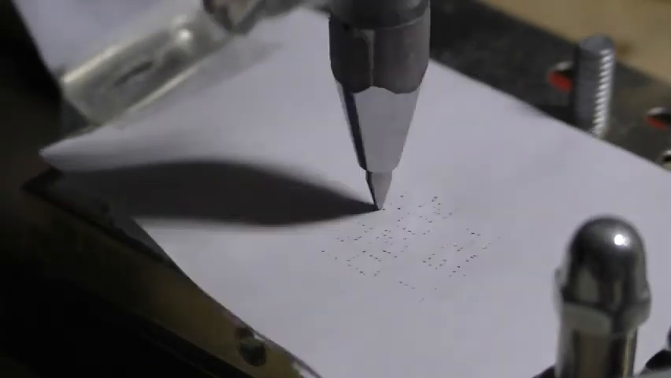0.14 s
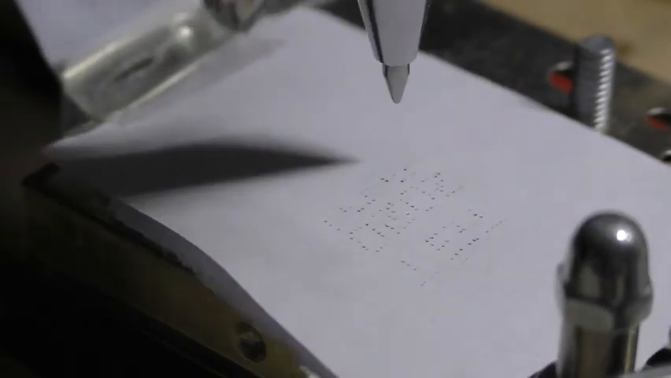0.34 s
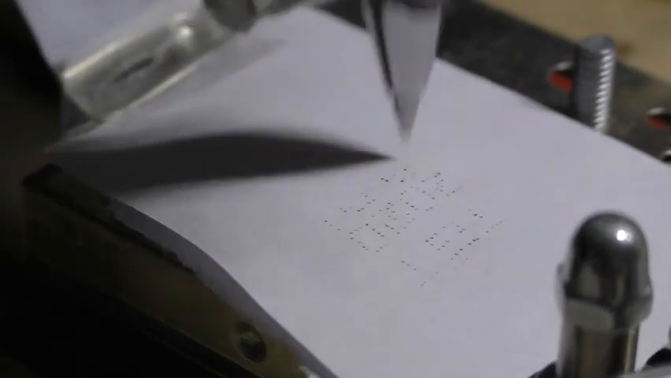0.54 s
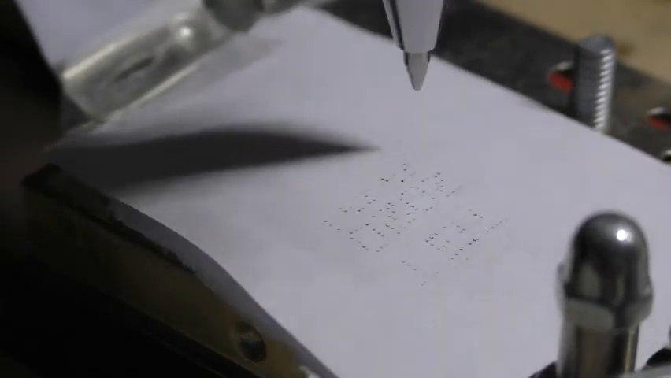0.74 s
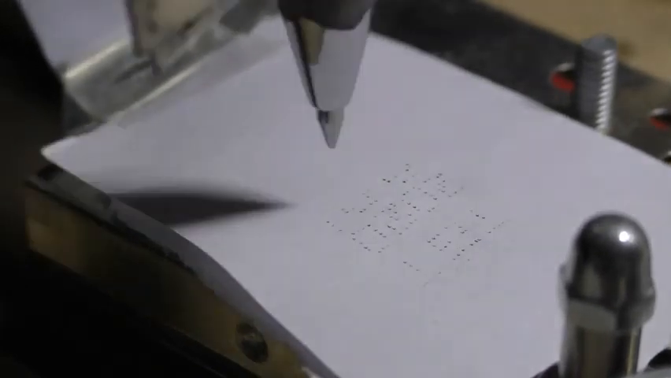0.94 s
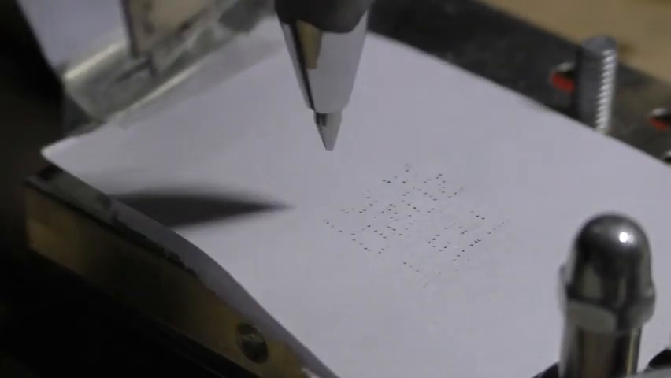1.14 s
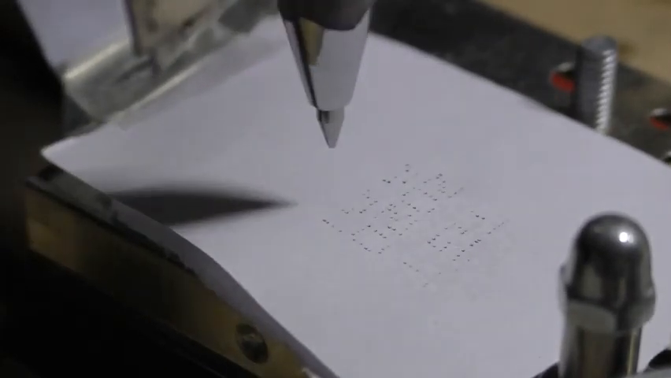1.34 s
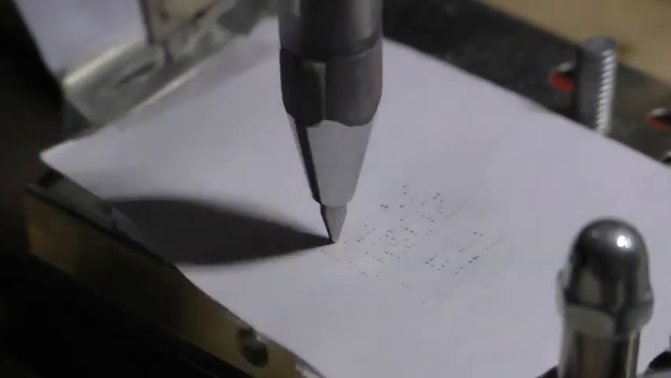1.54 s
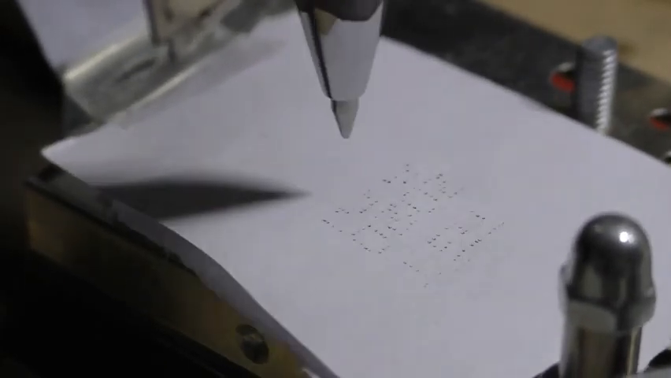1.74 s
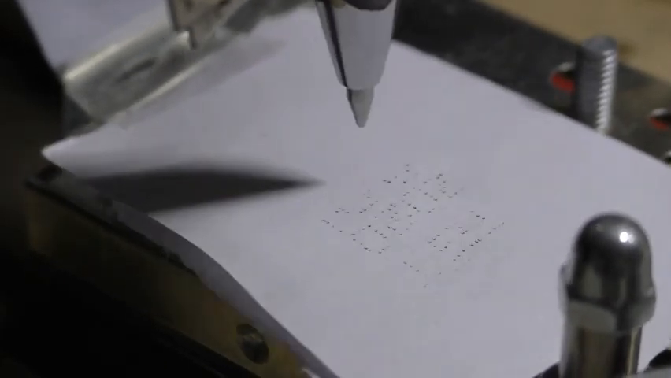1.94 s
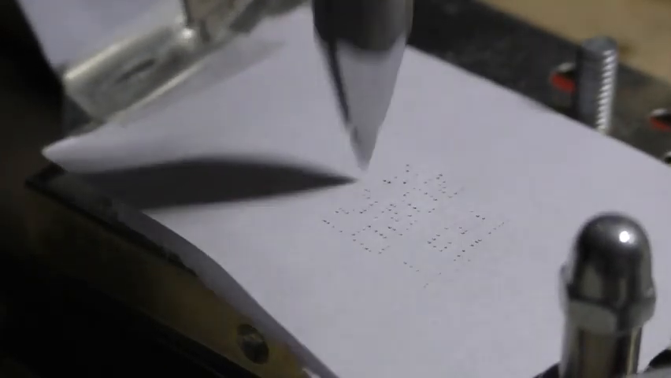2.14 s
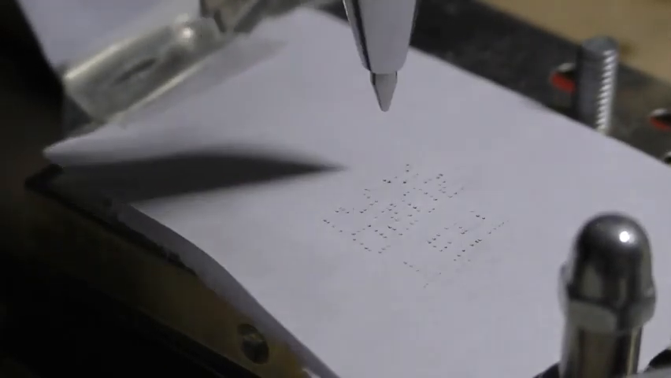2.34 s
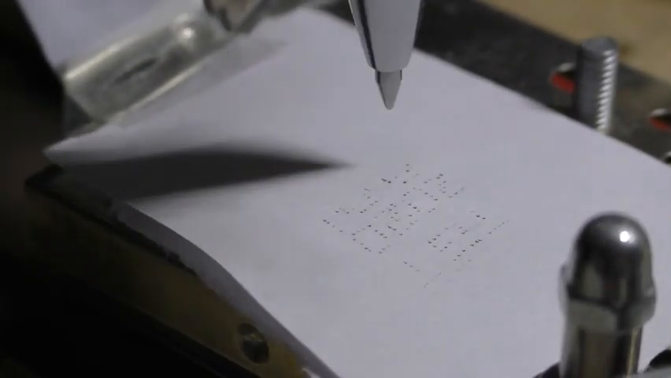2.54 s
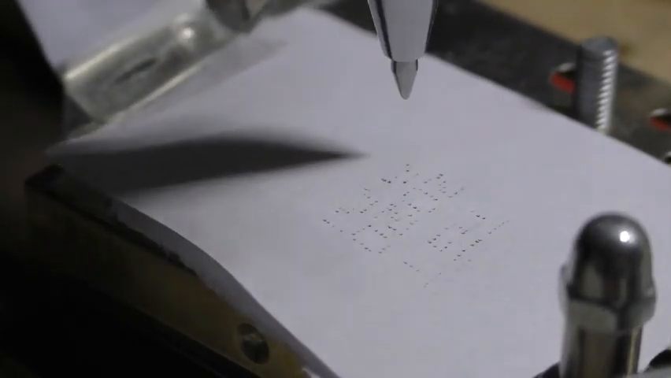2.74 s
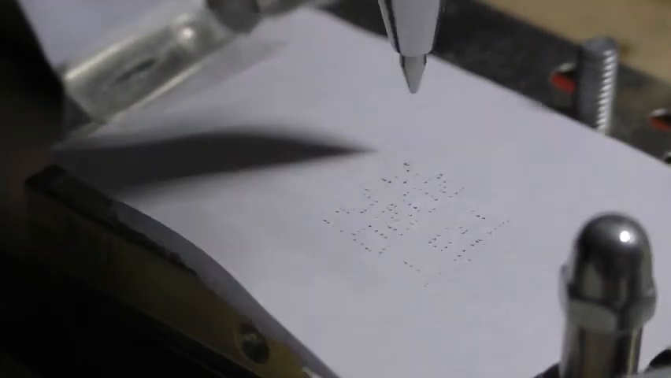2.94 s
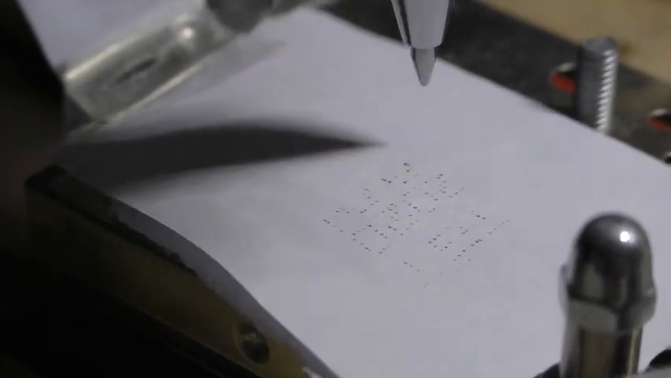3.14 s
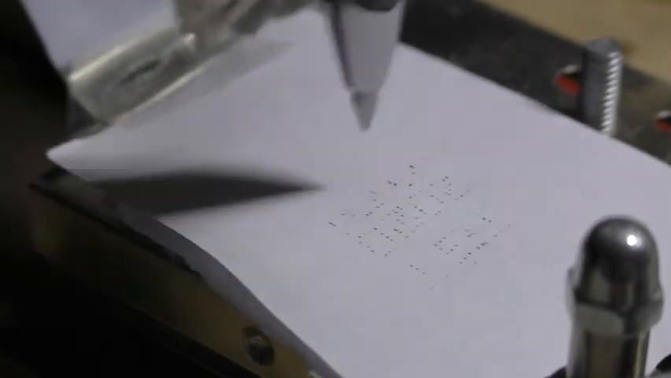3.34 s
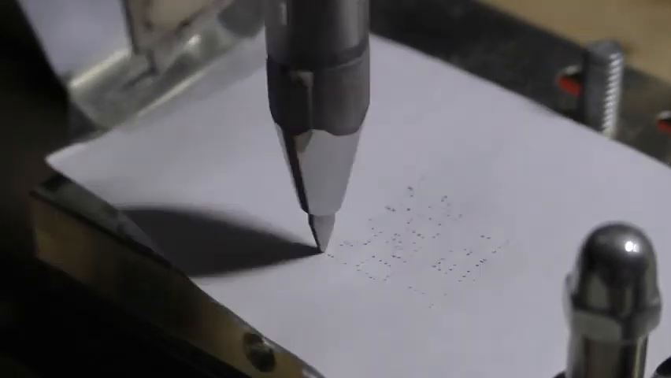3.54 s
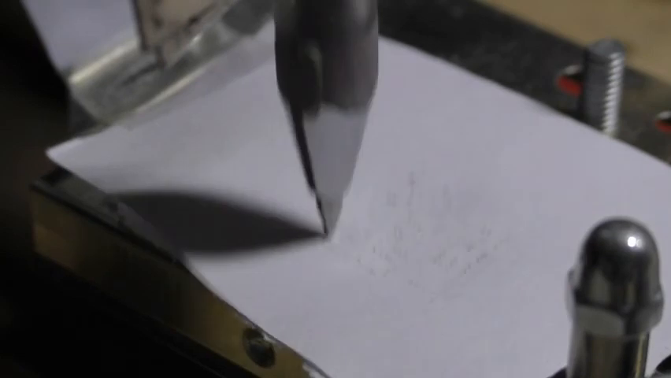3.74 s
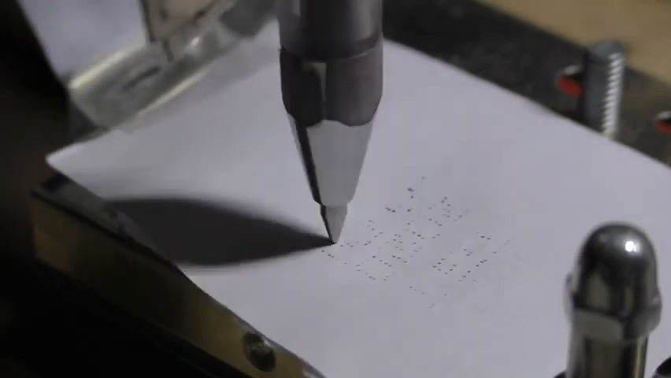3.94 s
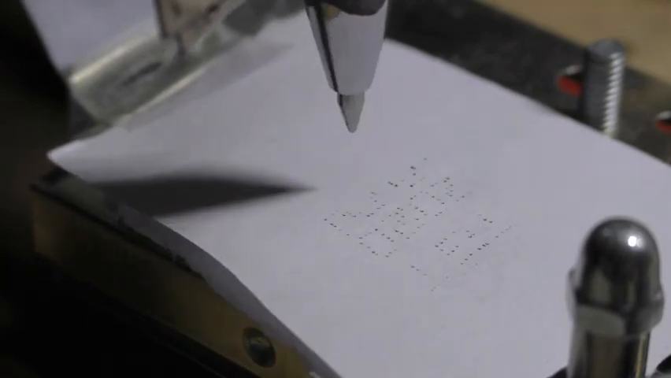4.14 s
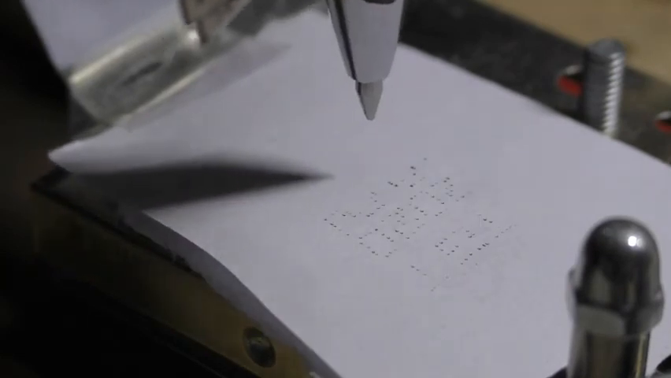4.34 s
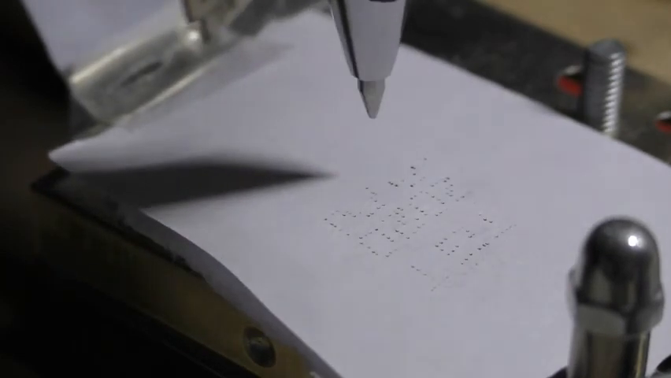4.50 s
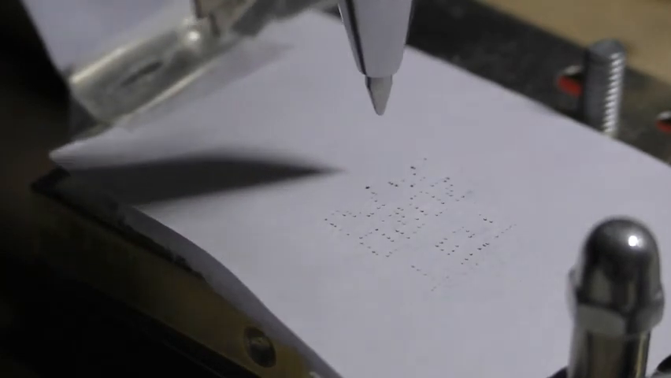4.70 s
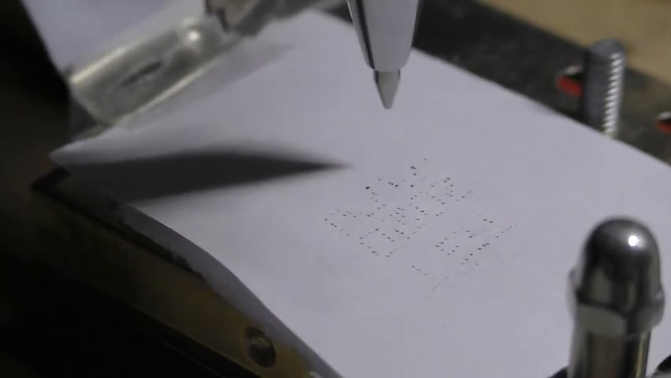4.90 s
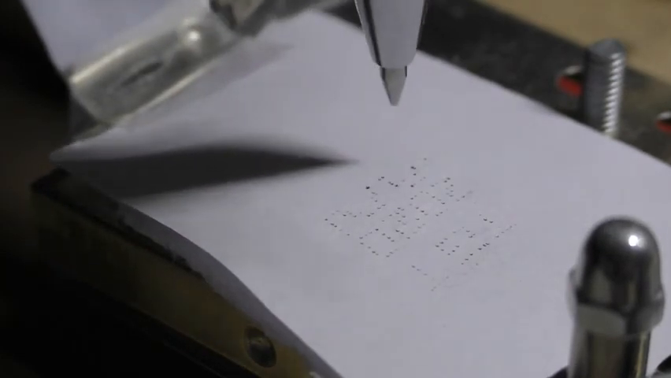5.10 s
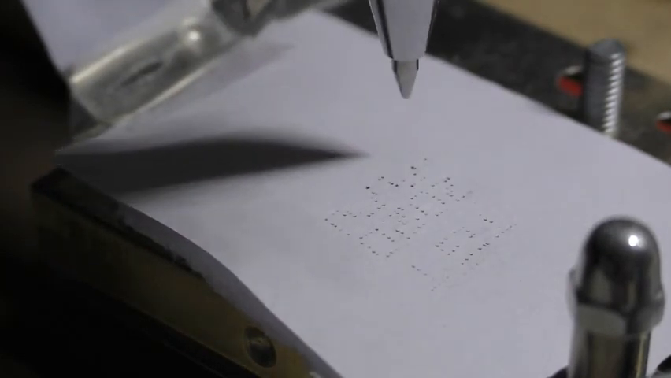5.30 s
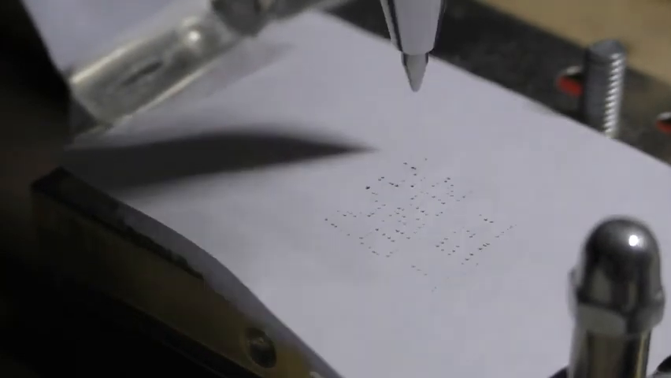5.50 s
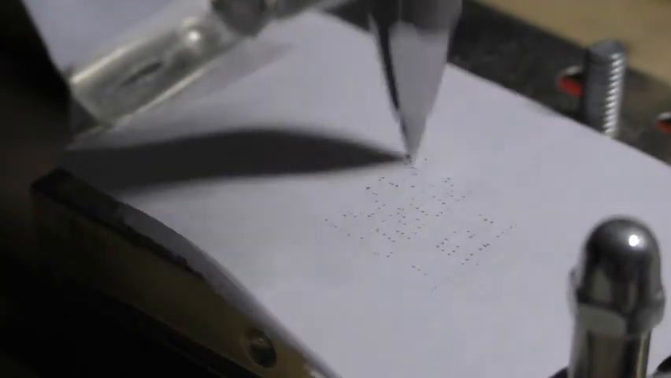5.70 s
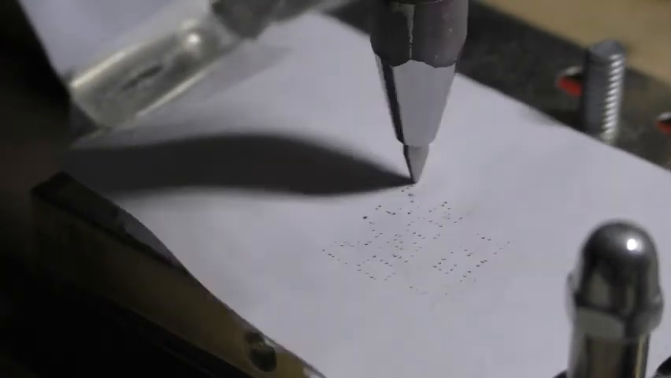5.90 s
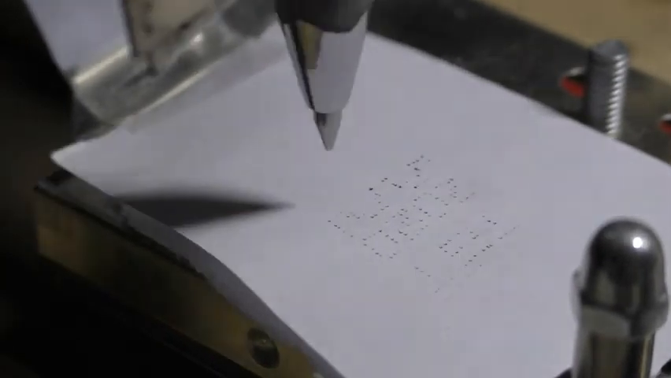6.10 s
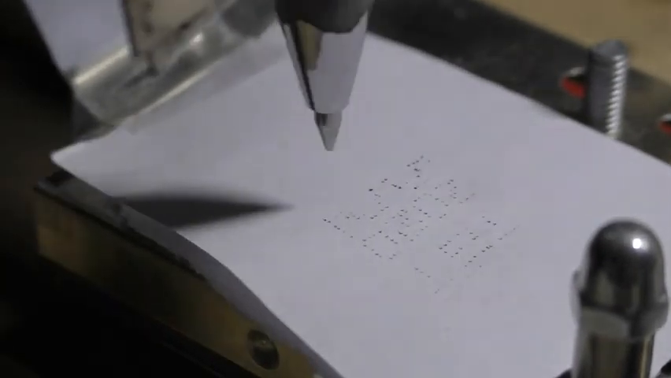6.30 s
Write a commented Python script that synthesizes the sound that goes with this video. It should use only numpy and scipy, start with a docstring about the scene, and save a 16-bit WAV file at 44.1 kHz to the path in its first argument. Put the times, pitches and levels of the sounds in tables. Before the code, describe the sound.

A small servo machine jabs a pen down onto paper and lifts it, close to the microphone in a quiet room. A quick gear whir leads into the first jab, and four more follow at uneven intervals, each a short, bright rattle of plastic gears with sharp clicks and a dull knock. Brief flicks and faint gear creeping fall between them, and a softer rasp comes last, over a low hum and thin hiss.

```python
"""Pen plotter making dots

A hobby servo jabs a pen down and lifts it, close to the microphone in a quiet room. Plastic gear teeth
rattle in their case, knock through their backlash and shake the frame. Between jabs the arm swings or
creeps to the next dot, over a low hum and a thin hiss."""
import sys
import numpy as np
from scipy import signal
from scipy.fft import rfft, irfft
from scipy.io import wavfile

SR = 44100
rng = np.random.default_rng(int(sys.argv[2]) if len(sys.argv) > 2 else 0)


def wrap_up_sound(samples):
    """Save the sound to the file named by the first command line argument, as 16-bit audio."""
    columns = np.atleast_2d(samples).T
    # keep every value between -1 and 1, then stretch to whole-number steps
    tamed = np.clip(columns, -1, 1)
    steps = np.round(tamed * 32767).astype(np.int16)
    wavfile.write(sys.argv[1], SR, steps)


N = 280031
T = np.arange(N) / SR

# Full pen strokes. Each row: start, drive and run-down in seconds, then in dB: gear level,
# low-band gain, ringing over clicks, take-up knock peak.
JABS = [(1.235, 0.09, 0.058, -26, 4.5, -1.5, -10), (3.1943, 0.063, 0.032, -27.5, 4.5, -8.5, -17),
        (3.5462, 0.13, 0.02, -24, 6, 5, -13.5), (4.595, 0.073, 0.045, -27, 1, 3.5, -9),
        (5.5754, 0.074, 0.063, -27, 4.5, -7.5, -8)]
# Fast arm swing and quieter reach. Each row: start, spin-up, drive and run-down in seconds,
# gear level and frame shake in dB.
SWING = [(0.954, 0.014, 0.072, 0.015, -29, -39.5)]
REACH = [(6.218, 0.027, 0.058, 0.014, -39, -59)]
# Pen servo case resonances. Each row: centre in Hz, width in Hz, relative level in dB.
CASE_MODES = [(1116, 87, -30.5), (1860, 120, -29), (2890, 220, -14), (3737, 170, -14.5), (4495, 140, -5.5),
              (5422, 160, 2.5), (6005, 68, 2), (7400, 510, -7.5), (8440, 82, -17.5), (8914, 180, -3),
              (9540, 120, -10), (11500, 110, -11.5), (11550, 160, -21), (11940, 810, -15), (15150, 86, -17)]
# Spectra of pen gear clicks, lightly loaded gears and frame shake.
# Each row: frequency in Hz, relative level in dB.
CASE_SPECTRUM = [(400, -31.5), (700, -38), (1100, -34), (2200, -26), (3500, -22), (4200, -12.5),
                 (5200, -0.5), (6500, -1.5), (8200, -2.5), (10200, 2), (12000, -6), (13300, -5),
                 (14200, -21), (15700, -19.5)]
LIGHT_GEAR_SPECTRUM = [(300, -45), (750, -35), (1100, -19), (2300, -18), (2950, -11), (3400, -16),
                       (5200, -7.5), (7100, -13.5), (8500, -5), (10300, -6.5), (15500, -22)]
FRAME_SPECTRUM = [(25, -12.5), (60, -6.5), (120, 2), (170, 3.5), (290, 0), (340, -15.5), (420, -24),
                  (700, -37), (1500, -62)]


def pen_servo(tooth_hz=2200, split_hz=3700):
    """Throbbing gear teeth rattle the case; load brings out the lower resonances."""
    moves = pen_moves()
    *_, gear_db, low_db, ring_db, _ = np.transpose(moves)
    throb = undb(1.4 * drift(260))
    clicks = body(teeth(tooth_hz, scatter_db=7, slide=0.67) * throb, CASE_SPECTRUM)
    contacts = teeth(tooth_hz, scatter_db=3, slide=0.67) * throb
    ringing = resonate(contacts, CASE_MODES, sway_db=0.6, sway_hz=12)
    clicks_db = gear_db - 10 * np.log10(1 + undb(ring_db) ** 2)  # clicks and ringing share the power
    out = 0
    for part, db in ((clicks, clicks_db), (ringing, clicks_db + ring_db)):
        low = signal.sosfiltfilt(signal.butter(6, split_hz, fs=SR, output="sos"), part)
        out += (part - low) * run_gain(moves, db) + low * run_gain(moves, db + low_db)
    return out


def pen_moves(spin_up_s=0.009, shake_re_gear_db=-20.5):
    """Jabs, then flicks: start, spin-up, drive, run-down in s; gear, low band, ringing, shake in dB."""
    # Short braked strokes. Each row: start, drive and run-down in seconds, then in dB: gear level,
    # low-band gain, ringing over clicks, frame shake.
    flicks = [(1.5822, .02, 0.014, -40, 4, 10, -65.5), (1.604, .051, 0.016, -26, 5.5, -4, -42.5),
              (3.8872, 0.011, 0.011, -28, -3, 2, -59), (4.911, 0.0425, 0.0076, -27.5, -1, 1.5, -50.5),
              (5.854, 0.0094, 0.0053, -28.5, -3, -2, -55)]
    jabs = [(start, spin_up_s, drive, fall, db, low_db, ring_db, db + shake_re_gear_db)
            for start, drive, fall, db, low_db, ring_db, _ in JABS]
    return jabs + [(start, spin_up_s, *rest) for start, *rest in flicks]


def backlash(take_up_s=0.0125, chatter_s=0.00078):
    """Gear slack closes early in each jab and again as the load shifts; its chatter rings the case."""
    # Mid-move gear knocks. Each row: start in seconds, peak in dB.
    knocks = [(1.2513, -10.5), (1.278, -14), (1.303, -10.5), (1.5977, -16), (1.6416, -11), (3.2209, -14),
              (3.243, -14), (3.2567, -11), (3.265, -13.5), (3.584, -6.5), (3.6088, -12), (3.636, -10.5),
              (3.8946, -15), (4.6174, -4.5), (4.638, -5), (4.9181, -14.5)]
    take_ups = [(start + take_up_s, db) for start, *_, db in JABS]
    case = impulse_response(CASE_SPECTRUM, CASE_MODES, modes_db=4.5)

    def knock(t):
        chatter = rng.standard_normal(len(t)) * t * np.exp(-t / chatter_s)
        return signal.fftconvolve(chatter, case)
    return strike(take_ups + knocks, knock)


def dull_knocks(onset_s=0.0013, knock_hz=850, knock_db=1, knock_s=0.0034, lag_s=0.0093, thump_s=0.0012):
    """Dull knocks with a brief ring, each followed by a short low thump."""
    # Each row: start in seconds, knock peak in dB, thump peak in dB.
    knocks = [(1.251, -45, -43.5), (1.303, -44, -54.5), (1.629, -45.5, -46), (3.231, -32.5, -48),
              (3.556, -36.5, -32.5), (4.637, -41.5, -26), (5.586, -39, -32)]
    # Modes of the ring. Each row: frequency in Hz, relative level in dB, T60 in seconds.
    ring_modes = [(1027, -2.5, .04), (1130, -2, .045), (1380, -3, .035), (1850, -9, .03)]
    band = signal.butter(2, [knock_hz / 2, knock_hz * 2], "bandpass", fs=SR, output="sos")

    def ringing_knock(t):
        ring = sum(undb(db - 60 * t / t60) * np.sin(2 * np.pi * hz * t) for hz, db, t60 in ring_modes)
        knock = unit_rms(signal.sosfilt(band, rng.standard_normal(len(t)))) * np.exp(-t / knock_s)
        onset = 1 - np.exp(-(t / onset_s) ** 2)
        return (ring + undb(knock_db) * knock) * onset
    thumps = sum(undb(db) * np.exp(-((T - start - lag_s) / thump_s) ** 2 / 2) for start, _, db in knocks)
    return thumps + strike([(start, db) for start, db, _ in knocks], ringing_knock)


def arm_swing(mesh_hz=1344, mesh_db=-14, third_db=-19):
    """In a fast swing the arm's gears whirr; their mesh sings, unsteady and buzzing with each turn."""
    # Gear click spectrum. Each row: frequency in Hz, relative level in dB.
    spectrum = [(300, -26), (700, -38), (900, -23.5), (1150, -9), (1400, -10), (1600, -17.5), (2100, -21),
                (3300, -14.5), (5800, -16.5), (7200, -15), (8500, -6), (11500, -13.5), (15500, -16)]
    # Arm resonances. Each row: centre in Hz, width in Hz, relative level in dB.
    modes = [(2370, 68, -12), (3990, 42, 1), (4600, 47, -2), (5450, 30, -8), (6200, 30, -8.5),
             (6680, 180, -5.5), (7840, 21, -4.5), (7900, 130, -2), (8460, 30, 1), (8100, 20, 3),
             (8900, 88, -3.5), (9400, 51, -3.5), (9500, 100, 2.5), (10500, 34, -13), (10900, 180, -2),
             (11640, 77, 2.5), (11600, 38, -5.5), (12000, 67, -5), (12100, 27, -3), (12900, 20, -7.5)]
    whirr = body(teeth(rate_hz=2700, scatter_db=-6, slide=0.67), spectrum, modes, modes_db=2.5)
    phase = 2 * np.pi * np.cumsum(mesh_hz * (1 + 0.0143 * drift(120))) / SR
    mesh = undb(mesh_db) * np.sin(phase) + undb(third_db) * np.sin(3 * phase)
    buzz = 1 + 0.3 * np.sin(phase / 3) + 0.3 * drift(450)
    *_, gear_db, _ = np.transpose(SWING)
    return (whirr + np.sqrt(2) * mesh * buzz) * run_gain(SWING, gear_db)


def arm_reach():
    """In a quieter arm move the gears rasp."""
    # Gear click spectrum. Each row: frequency in Hz, relative level in dB.
    spectrum = [(300, -31), (800, -33.5), (1100, -16), (2300, -34), (3300, -17), (5200, -19), (8000, -11),
                (10200, -10), (12000, -12), (15500, -22)]
    # Arm resonances. Each row: centre in Hz, width in Hz, relative level in dB.
    modes = [(1830, 100, -9.5), (2560, 45, -10.5), (3022, 43, -6.5), (3390, 116, -11), (4650, 190, -13.5),
             (6640, 92, 0), (7260, 43, -2), (7900, 70, -3.5), (9200, 63, -2), (10030, 110, -2.5),
             (11000, 110, -5.5), (11600, 34, -14.5), (11800, 110, -11)]
    rasp = body(teeth(rate_hz=3200, scatter_db=5.5, slide=0.7), spectrum, modes, modes_db=2.5)
    *_, gear_db, _ = np.transpose(REACH)
    return rasp * run_gain(REACH, gear_db)


def coasting(powered_s=0.15, fade_db_per_s=170, whirr_db=-46, extra_shake_db=3, edge_s=0.0094):
    """After a jab or reach, unloaded gears spin on and shake the frame until the power is cut."""
    contacts = teeth(rate_hz=3100, scatter_db=-2, slide=0.8)
    whirr = body(contacts, LIGHT_GEAR_SPECTRUM, CASE_MODES, modes_db=-1.5)
    shake = body(rng.standard_normal(N), FRAME_SPECTRUM)
    out = 0
    for start, _, drive, *_, shake_db in pen_moves()[:len(JABS)] + list(REACH):
        free_s = T - start - drive
        gate = np.clip(np.minimum(free_s, start + powered_s - T) / edge_s, 0, 1)
        fade = undb(-fade_db_per_s * np.clip(free_s, 0, 1))
        out += gate * fade * (undb(whirr_db) * whirr + undb(shake_db + extra_shake_db) * shake)
    return out


def frame_shake():
    """Every motor run shakes the frame."""
    runs = (pen_moves(), SWING, REACH, arm_steps(), arm_turns())
    gain = sum(run_gain(moves, np.transpose(moves)[-1]) for moves in runs)
    return body(teeth(rate_hz=330, scatter_db=1.5, slide=0.47), FRAME_SPECTRUM) * gain


def arm_creep(step_ring_db=-5):
    """In tiny steps and slow turns the gears whisper and the arm rings faintly."""
    # Arm resonances. Each row: centre in Hz, width in Hz, relative level in dB.
    modes = [(1010, 32, -15.5), (1860, 63, -5.5), (3420, 47, -7.5), (3884, 110, -1), (4490, 70, -3),
             (5477, 35, -9), (5970, 190, -3), (6670, 92, -6.5), (7530, 36, -5.5), (8060, 110, -6.5),
             (8290, 25, -10.5), (9100, 83, -4.5)]
    steps, turns = arm_steps(), arm_turns()
    *_, step_db, _ = np.transpose(steps)
    *_, turn_db, ring_db, _ = np.transpose(turns)
    whisper = body(teeth(rate_hz=1600, scatter_db=12, slide=0.9), LIGHT_GEAR_SPECTRUM)
    ringing = resonate(rng.standard_normal(N), modes, sway_db=4, sway_hz=6.6)
    stepping = unit_rms(whisper + undb(step_ring_db) * ringing) * run_gain(steps, step_db)
    return stepping + whisper * run_gain(turns, turn_db) + ringing * run_gain(turns, turn_db + ring_db)


def arm_steps(spin_up_s=0.0075, drive_s=0.0086):
    """Brief servo pushes that die away, as moves."""
    # Each row: start and run-down in seconds, gear level and frame shake in dB.
    steps = [(.02, 0.13, -61, -80), (0.184, 0.17, -64, -65), (.44, .05, -65.5, -63),
             (0.606, 0.21, -67, -61), (.878, 0.013, -66.5, -69), (.93, 0.048, -62.5, -77),
             (1.10, 0.22, -69.5, -65), (1.725, 0.2, -75.5, -68), (1.89, 0.05, -65.5, -78),
             (2.15, 0.11, -68.5, -58), (2.33, 0.084, -66.5, -82), (2.384, 0.084, -64, -73),
             (2.497, 0.13, -62, -65.5), (2.853, 0.076, -65, -72), (2.915, .16, -59.5, -57.5),
             (3.405, 0.087, -52.5, -50.5), (3.968, 0.14, -66.5, -78), (4.221, 0.044, -67.5, -65),
             (4.255, 0.061, -60, -83), (4.467, 0.11, -67, -65), (5.018, 0.2, -69.5, -63.5),
             (5.437, 0.2, -70.5, -64.5), (5.865, 0.11, -65, -75), (5.928, 0.17, -64, -53.5)]
    return [(start, spin_up_s, drive_s, *rest) for start, *rest in steps]


def arm_turns(spin_up_s=0.026, run_down_s=0.073, shake_db=-66.5):
    """Slow steady servo turns, as moves."""
    # Each row: start and drive in seconds, gear level and ringing over whisper in dB.
    turns = [(1.926, 0.054, -62, 0), (4.267, 0.055, -66.5, 8.5), (5.227, 0.067, -71.5, -3.5)]
    return [(start, spin_up_s, drive, run_down_s, *levels, shake_db) for start, drive, *levels in turns]


def joint_rub(swell_share=0.7):
    """The linkage rubs dully in its joints."""
    # Rubs. Each row: start, hold and fade in seconds, level in dB.
    rubs = [(.665, 0.028, 0.099, -70.5), (3.408, 0.0062, 0.08, -57), (4.27, 0.031, 0.064, -74),
            (5.23, 0.052, 0.76, -78.5), (5.925, 0.022, 0.43, -82)]
    # Joint friction spectrum. Each row: frequency in Hz, relative level in dB.
    spectrum = [(350, -37), (600, -8), (850, -24), (1100, 1.5), (1450, -7), (1850, 4.5), (2300, -25),
                (3500, -8), (8000, -34)]
    moves = [(start, swell_share * hold, hold, fade) for start, hold, fade, _ in rubs]
    friction = body(teeth(rate_hz=3300, scatter_db=6, slide=0.76), spectrum)
    return friction * run_gain(moves, np.transpose(rubs)[-1])


def room(hum_db=-64, hiss_db=-71, split_hz=3000, dip_db=-4.5):
    """A low restless hum, and hiss whose middle range sits lower and wavers."""
    # Hum and hiss spectra. Each row: frequency in Hz, relative level in dB.
    hum_spectrum = [(12, -43), (20, -16.5), (32, -20.5), (97, -6.5), (125, 0), (162, -1.5), (192, -0.5),
                    (255, -4), (312, -12.5), (340, -19.5), (370, -22.5), (409, -38.5), (600, -46),
                    (780, -56.5), (1320, -120)]
    hiss_spectrum = [(350, -51.5), (600, -13.5), (800, -13.5), (1050, -8.5), (1450, -10), (1900, -15),
                     (2400, -14), (2800, -9.5), (3300, -18.5), (4500, -20), (6500, -19), (8000, -13),
                     (10300, -4), (15800, -12)]
    hum = body(rng.standard_normal(N), hum_spectrum) * undb(hum_db + drift(6))
    hiss = body(rng.standard_normal(N), hiss_spectrum) * undb(hiss_db)
    middle = signal.sosfiltfilt(signal.butter(2, split_hz, fs=SR, output="sos"), hiss)
    waver = undb(dip_db + 0.8 * drift(22))
    return hum + hiss + middle * (waver - 1)


def idle_whine(whine_hz=2815, width_hz=150, idle_db=-94.5, fade_s=0.056):
    """Servos at rest whine faintly, louder while they hold a load."""
    # Load holds. Each row: start and end in seconds, added whine in dB.
    holds = [(.25, 0.613, -88), (1.126, 2.02, -86.5), (3.29, 3.5, -87)]
    whine = resonate(rng.standard_normal(N), [(whine_hz, width_hz, 0)], sway_db=2.5, sway_hz=13)
    load = sum(undb(db) * np.clip(np.minimum(T - start, end - T) / fade_s, 0, 1)
               for start, end, db in holds)
    return whine * (undb(idle_db) + load)


def teeth(rate_hz, scatter_db, slide):
    """Uneven tooth contacts of random strength, with sliding noise between them."""
    tooth_count = np.cumsum(rate_hz * np.exp(0.4 * drift(900)) / SR)
    contacts = np.diff(np.floor(tooth_count), prepend=0)
    strength = undb(scatter_db * np.clip(rng.standard_normal(N), -2, 2)) * rng.choice([-1, 1], N)
    return unit_rms(unit_rms(contacts * strength) + slide * rng.standard_normal(N))


def run_gain(moves, levels_db, brake_db=30, stop_s=0.003):
    """Motor envelope per move: spin-up, drive, ever faster braking, then friction stops it dead."""
    gain = np.zeros(N)
    for (start, rise, drive, fall, *_), level_db in zip(moves, levels_db):
        t = T - start
        length_s = drive + fall + stop_s
        on = (t > 0) & (t < length_s)
        t = t[on]
        spin_up = np.minimum(t / rise, 1) ** 1.5
        braking = (np.maximum(t - drive, 0) / fall) ** 1.3
        stop = np.minimum((length_s - t) / stop_s, 1)
        gain[on] += spin_up * undb(level_db - brake_db * braking) * stop
    return gain


def strike(events, shape):
    """One fresh blow of the given shape per (start in s, peak in dB)."""
    out = np.zeros(N)
    for start, db in events:
        blow = shape(T[:SR // 4])
        i = int(start * SR)
        out[i:i + len(blow)] += (undb(db) * blow / np.abs(blow).max())[:N - i]
    return out


def resonate(x, modes, sway_db, sway_hz):
    """Ring each mode with x at a randomly swaying strength; rms 1."""
    out = 0
    for hz, width, db in modes:
        band = signal.iirpeak(min(hz, 0.45 * SR), hz / (1.5 * width), fs=SR)
        ring = signal.lfilter(*band, signal.lfilter(*band, x))
        out += ring * undb(db + sway_db * drift(sway_hz))
    return unit_rms(out)


def body(x, spectrum, modes=(), modes_db=0):
    """Ring a body with x; rms 1."""
    return unit_rms(signal.fftconvolve(x, impulse_response(spectrum, modes, modes_db))[:N])


def impulse_response(spectrum, modes, modes_db):
    """Minimum-phase response of a body: a broad spectrum with resonances on it."""
    hz = np.maximum(np.fft.rfftfreq(8192, 1 / SR), 1)
    points_hz, points_db = np.transpose(spectrum)
    power = undb(np.interp(np.log(hz), np.log(points_hz), points_db)) ** 2
    for centre, width, db in modes:
        detuning = (hz - centre ** 2 / hz) / (2 * width)
        power += undb(db + modes_db) ** 2 / (1 + detuning ** 2) ** 2
    cepstrum = irfft(np.log(power) / 2)
    half = len(cepstrum) // 2
    cepstrum[1:half] *= 2
    cepstrum[half + 1:] = 0
    return irfft(np.exp(rfft(cepstrum)))


def drift(rate_hz):
    """Smooth random drift with a spread near 1."""
    knots = rng.standard_normal(N)
    return np.interp(T * rate_hz, np.arange(N), knots) * np.sqrt(3 / 2)


def undb(db):
    """Decibels to gain."""
    return 10 ** (np.asarray(db) / 20)


def unit_rms(x):
    """Scale to rms 1."""
    return x / np.sqrt(np.mean(x ** 2))


def scene():
    """Plotter and room at one microphone."""
    pen = pen_servo() + backlash() + dull_knocks() + coasting()
    arm = arm_swing() + arm_reach() + arm_creep() + joint_rub()
    return (pen + arm + frame_shake() + room() + idle_whine())[None]


def record(dry):
    """The hardest knocks overload the microphone input; the recorder cuts the top."""
    ceiling, top_hz = 0.31, 15750
    squashed = dry / (1 + (dry / ceiling) ** 8) ** (1 / 8)
    return signal.sosfilt(signal.ellip(10, 0.2, 70, top_hz, fs=SR, output="sos"), squashed)


dry = scene()
out = record(dry)
wrap_up_sound(out)
```